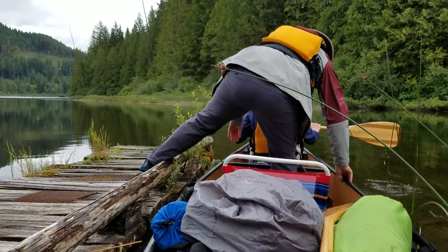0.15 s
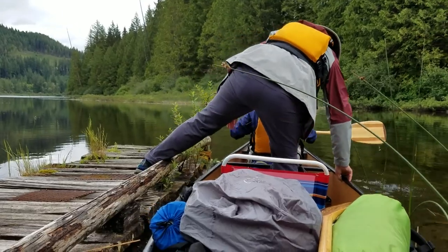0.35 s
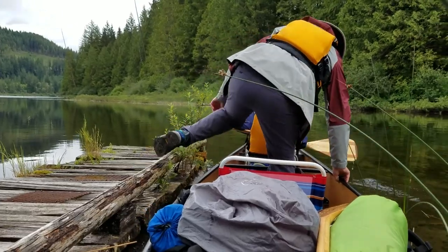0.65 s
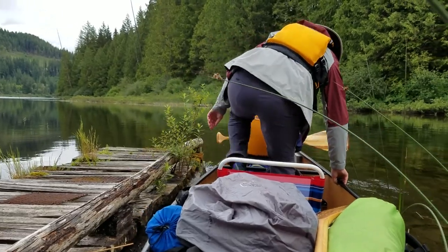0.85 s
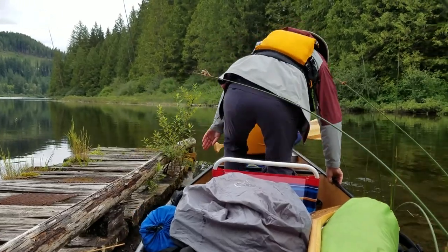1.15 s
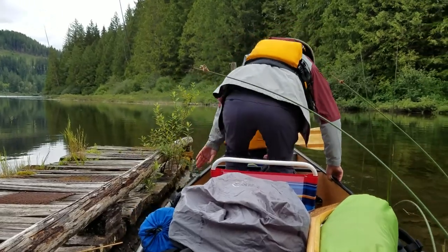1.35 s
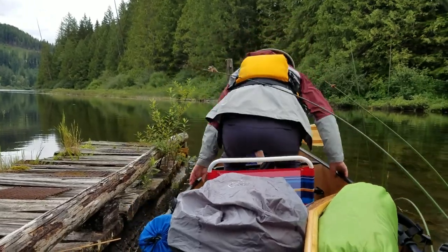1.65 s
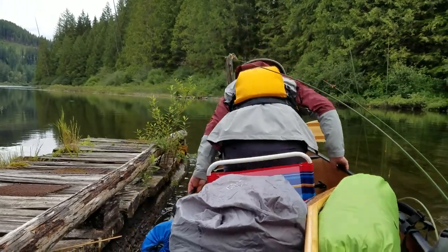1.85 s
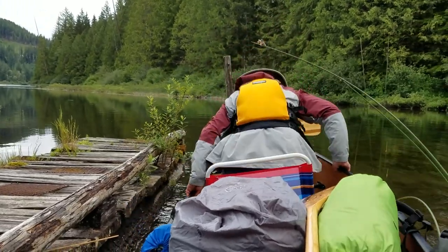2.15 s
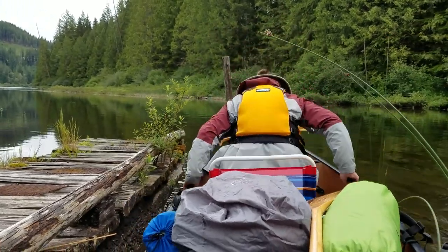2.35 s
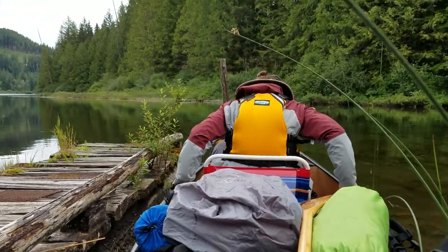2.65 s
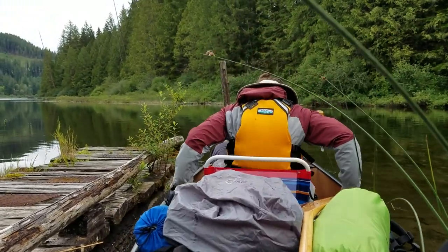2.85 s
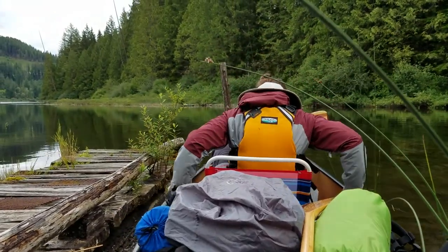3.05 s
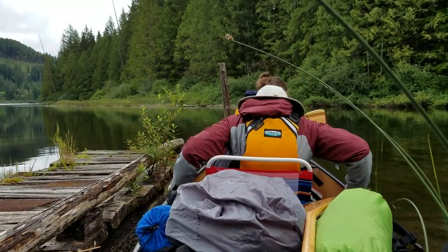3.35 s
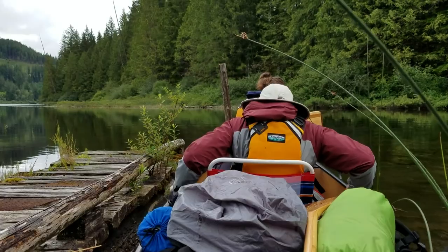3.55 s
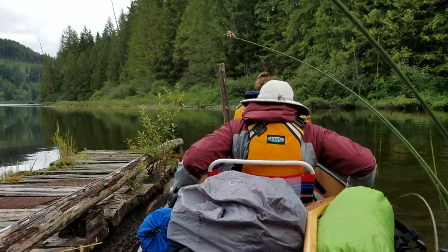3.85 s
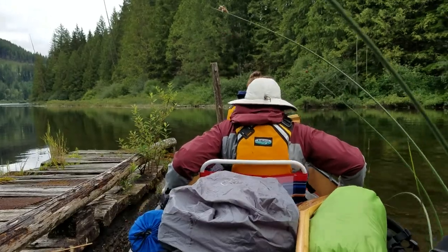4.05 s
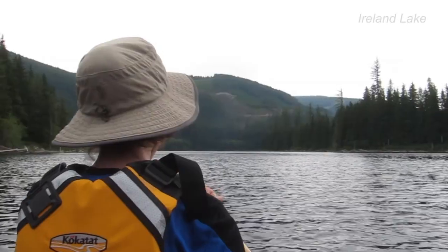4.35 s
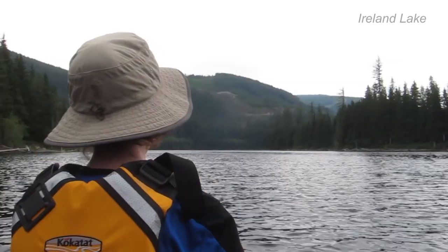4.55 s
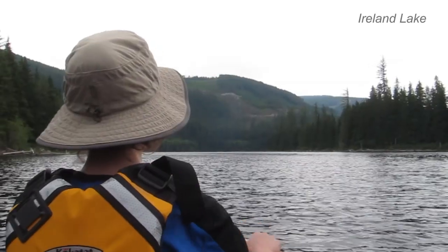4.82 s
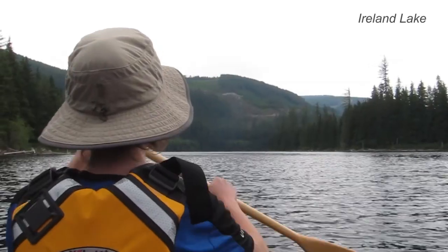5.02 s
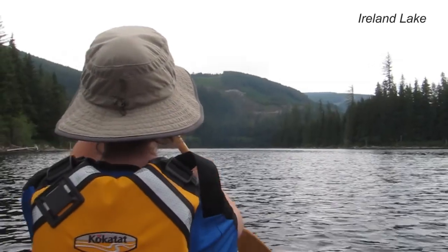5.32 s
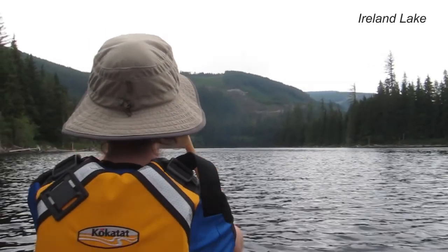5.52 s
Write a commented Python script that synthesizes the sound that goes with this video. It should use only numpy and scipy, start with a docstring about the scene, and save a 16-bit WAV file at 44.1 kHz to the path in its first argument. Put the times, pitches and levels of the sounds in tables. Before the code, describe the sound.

For the first four seconds, a person climbs into a loaded canoe at a dock. Feet and gear strike the hollow hull in uneven knocks and thumps, each ringing briefly. The strongest land at about 0.7, 1.4 and 2.3 seconds, with a deeper cluster around 3.1 and lighter bumps between. Underneath, clothing rustles and scuffs softly, squeaking faintly near 1.6 seconds, and shifting packs rumble through the hull, swelling around 4 seconds. At 4.2 seconds the sound cuts to open water on a thinner microphone with little bass. A paddle stirs a soft wash with fizzing spray, small splashes and plinking drips, and a short rising gulp comes at 5 seconds. Brief wind pops hit the microphone, mostly on the left and strongest near 5.3 seconds. The water continues until the end at about 5.7 seconds.

```python
"""At a log dock a paddler climbs into a loaded canoe: feet and gear knock the hollow hull, which rings
in its damped modes, while cloth scuffs and packs shift with the noise of friction.
Then, out on open water and on a thinner-sounding microphone, paddle water fizzes, drips and gulps
as trapped air resonates, and eddies of wind pop at the microphone's ports."""
import sys
import numpy as np
from scipy import signal
from scipy.fft import rfft, irfft, next_fast_len
from scipy.io import wavfile
from scipy.ndimage import uniform_filter1d, map_coordinates

SR = 44100
rng = np.random.default_rng(int(sys.argv[2]) if len(sys.argv) > 2 else 0)


def wav_record(signal):
    """Record a signal, one row per channel, as 16-bit PCM in the file named by sys.argv[1]."""
    frames = np.transpose(np.atleast_2d(signal))
    bounded = np.clip(frames, -1, 1)
    # unit amplitude maps onto the largest positive 16-bit level
    quanta = np.round(bounded * 32767).astype(np.int16)
    wavfile.write(sys.argv[1], SR, quanta)


N = 250488
AFLOAT_S = 4.234  # the dock gives way to open water
AFLOAT_LENGTH_S = N / SR - AFLOAT_S

# likeness of left and right at the dock and on open water: freq_hz, correlation
DOCK_COHERENCE = [(60, 0.34), (180, 0.4), (550, 0.74), (1650, 0.28), (4970, -0.063), (15000, -0.0045)]
OPEN_COHERENCE = [(300, .3), (1000, 0.23), (3000, 0.53), (6800, -0.27), (15000, 0.67)]
# packs and body shifting: time_s, rumble_db, rustle_db, hiss_db
SHIFT_LEVELS = [(0.0, -65.5, -67.5, -71.5), (0.36, -67.5, -65.5, -71.5), (0.52, -62.5, -60.5, -68),
                (0.63, -63, -63.5, -71), (1.19, -57, -63, -71), (1.41, -44, -63.5, -69.5),
                (1.53, -50.5, -56, -63), (1.6, -48, -54, -61.5), (1.73, -59, -59, -64.5),
                (2.12, -44, -56.5, -65.5), (2.26, -51.5, -58, -61.5), (2.37, -42.5, -57, -61.5),
                (2.56, -55, -61.5, -67), (3.01, -56.5, -62, -66.5), (3.11, -36, -63, -67),
                (3.27, -52.5, -55.5, -63.5), (3.55, -58, -64.5, -69), (3.78, -50.5, -62.5, -69),
                (3.96, -56.5, -54, -57.5), (4.07, -35, -46, -52.5), (4.23, -62, -48.5, -56.5)]
# water beside the hull: time_s, wash_db, spray_db
WATER_LEVELS = [(4.234, -51.5, -62), (4.33, -54, -65), (4.4, -57, -65), (4.58, -58, -61), (4.66, -52, -57),
                (4.73, -52, -57), (4.79, -58, -64), (4.9, -59, -61), (4.98, -58, -51), (5.05, -59, -55),
                (5.09, -63.5, -63), (5.2, -54.5, -63), (5.32, -69.5, -69), (5.42, -59.5, -67),
                (5.46, -68.5, -69), (5.55, -56, -66), (5.68, -62, -66)]


def amp(db):
    return 10 ** (np.asarray(db) / 20)


def unit_rms(x):
    return x / np.sqrt(np.mean(x ** 2) + 1e-20)


def along(points, hz):
    """Interpolation of (freq_hz, value) points on a logarithmic frequency axis."""
    f, v = np.transpose(points)
    return np.interp(np.log(hz + 1), np.log(f + 1), v)


def curves(rows):
    """Linear interpolation, sample by sample, of each column after the time."""
    s, *cols = np.transpose(rows)
    return [np.interp(np.arange(N) / SR, s, c) for c in cols]


def wobble(rate_hz):
    """Smooth random modulation: a spline through Gaussian knots."""
    knots = rng.standard_normal(int(N * rate_hz / SR) + 4)
    return map_coordinates(knots, [np.arange(N) * rate_hz / SR])


def filtered(x, response):
    """Linear filtering: the spectrum times a frequency response."""
    m = next_fast_len(x.shape[-1] + 8192)
    return irfft(rfft(x, m) * response(np.fft.rfftfreq(m, 1 / SR)), m)[..., :x.shape[-1]]


def add(track, s, sound, pan_db=0):
    """Superposition of a sound at time s, louder on the left by pan_db."""
    piece = track[:, round(s * SR):][:, :sound.shape[-1]]
    piece += (sound * amp([[pan_db / 2], [-pan_db / 2]]))[:, :piece.shape[1]]


def noise(spectrum, coherence, patchy_db=0):
    """Partly coherent stereo noise of rms 1, its gain patchy in time and frequency by patchy_db."""
    pair = rng.standard_normal((2, N))
    if patchy_db:
        cells = signal.stft(pair, nperseg=256)[2]
        patches = uniform_filter1d(rng.standard_normal(cells.shape[1:]), size=6, axis=0)
        patches = uniform_filter1d(patches, size=6, axis=1)
        pair = signal.istft(cells * amp(patchy_db * unit_rms(patches)), nperseg=256)[1][:, :N]

    def mid_side(hz):
        angle = np.arccos(np.clip(along(coherence, hz), -1, 1)) / 2
        return amp(along(spectrum, hz)) * [np.cos(angle), np.sin(angle)]
    mid, side = filtered(pair, mid_side)
    return unit_rms(np.array([mid + side, mid - side]))


def swell(length_s):
    """A critically damped envelope: a quick rise and a slower fall."""
    u = np.arange(round(6 * length_s * SR)) / (.4 * length_s * SR)
    return u * np.exp(1 - u)


def burst(centre_hz, octaves, length_s):
    """A swell of band-limited stereo noise, 6 dB down at `octaves` from its centre."""
    envelope = swell(length_s)
    m = next_fast_len(len(envelope) + 1024)
    white = rng.standard_normal((3, m))
    pair = white[0] + 1.45 * white[1:]
    band = amp(-6 * (np.log2((np.fft.rfftfreq(m, 1 / SR) + 1) / centre_hz) / octaves) ** 2)
    return envelope * unit_rms(irfft(rfft(pair) * band, m))[:, :len(envelope)]


def bubble(hz, climb_octaves, life_s):
    """Bubble resonance: a damped, ragged tone whose pitch climbs as the bubble nears the surface."""
    age = np.arange(round(2 * life_s * SR)) / (life_s * SR)
    ragged = np.interp(age, np.linspace(0, 2, 12), rng.standard_normal(12))
    phase = 2 * np.pi * np.cumsum(hz * 2 ** (climb_octaves * age ** 1.5)) / SR + .5 * ragged
    return np.sin(phase) * (1 - np.exp(-age * life_s / .0005)) * amp(-15 * age ** 1.5)


def hull_rumble():
    """Structure-borne sound: shifting packs rumble through the hull."""
    # rumble spectrum: freq_hz, density_db
    spectrum = [(15, -43), (25, -31), (32, -31), (38, -3), (118, 2.5), (325, -3.5), (461, -10.5),
                (560, -14), (700, -24), (910, -55.5), (1540, -120)]
    rumble_db = curves(SHIFT_LEVELS)[0]
    return amp(rumble_db + 2.5 * wobble(25)) * noise(spectrum, coherence=[(60, .9), (600, .85)])


def cloth():
    """Friction noise: cloth rustles, hisses and squeaks; each scuff is a swell with its own colour."""
    # spectra of the rustle and the hiss: freq_hz, density_db
    rustle_spectrum = [(290, -8.5), (500, -7.5), (832, -8), (1210, -7), (1330, -11), (1590, -8.5),
                       (6000, -24.5), (7800, -43), (13200, -120)]
    hiss_spectrum = [(2350, -15), (4000, -5), (4340, -7), (6520, -7.5), (7400, -9.5), (13100, -4),
                     (15800, -4)]
    # cloth, soles and buckles scuffing: time_s, level_db, centre_hz, treble_db, pan_db, length_s
    scuffs = [(0.5315, -59.5, 1800, -6.5, 3.5, 0.025), (0.632, -56, 1360, -38, -7, 0.0091),
              (0.701, -66.5, 5390, -13.5, -3, 0.0058), (0.958, -69.5, 6200, -22, 2, 0.0061),
              (1.012, -62.5, 2650, -19.5, 0, 0.029), (1.1474, -45, 1350, -16, -1.5, 0.022),
              (1.5226, -50.5, 1360, -29.5, -12.5, 0.006), (1.5872, -48, 1700, -17.5, -3, .012),
              (1.598, -55, 3640, -10, 8.5, .015), (1.631, -48.5, 1990, -22.5, -1.5, .02),
              (1.975, -53, 970, -29, 3.5, 0.009), (2.053, -41, 760, -40, -2, .013),
              (2.087, -42, 1500, -40.5, -1.5, 0.0094), (2.139, -51.5, 1230, -26.5, -4.5, 0.014),
              (2.487, -60.5, 1500, -6.5, -1.5, 0.023), (2.749, -61, 1210, -16, -1, 0.004),
              (3.042, -44.5, 1050, -39, 2, 0.016), (3.091, -42, 1030, -23.5, -5, 0.0065),
              (3.271, -39, 1490, -17, -5.3, 0.01), (3.41, -56, 1660, -12.5, -7.5, 0.011),
              (3.5364, -60, 2260, -11, 2, 0.00856), (3.606, -57.5, 1230, -13.5, 0.5, .012),
              (3.7805, -53, 1700, -14, 0, 0.026), (3.833, -47, 1090, -16.5, .6, .015),
              (3.855, -53.5, 1550, -11, -5.5, 0.011), (4.211, -46, 1790, -16.5, 4, 0.019)]
    # narrow-band squeaks of rubbed cloth: start_s, level_db, centre_hz
    squeaks = [(1.545, -61, 2020), (1.575, -55.5, 3860), (1.6, -61, 4080), (1.628, -49.5, 2070),
               (1.632, -60, 4200)]
    _, rustle_db, hiss_db = curves(SHIFT_LEVELS)
    rubs, treble_gain = np.zeros((2, 2, N))
    for s, db, centre_hz, treble_db, pan_db, length_s in scuffs:
        add(rubs, s - .002, amp(db) * burst(centre_hz, octaves=.63, length_s=length_s), pan_db)
        add(treble_gain, s - .002, amp(db + treble_db) * swell(length_s), pan_db)
    for s, db, centre_hz in squeaks:
        add(rubs, s, amp(db) * burst(centre_hz, octaves=.15, length_s=.025), pan_db=-3)
    rustle = amp(rustle_db + 1.8 * wobble(30)) * noise(rustle_spectrum, DOCK_COHERENCE, patchy_db=1.5)
    hiss_gain = amp(hiss_db + .4 * wobble(14)) + treble_gain
    return rustle + rubs + hiss_gain * noise(hiss_spectrum, DOCK_COHERENCE, patchy_db=-.2)


def wash():
    """Turbulent water beside the hull: broadband noise and a swarm of tiny resonating bubbles."""
    # wash spectrum: freq_hz, density_db
    spectrum = [(59, -49.5), (100, -1), (261, -38), (417, -17), (874, 1.5), (2120, -1), (3580, -1.5),
                (6370, -8.5), (7500, -18), (9750, -39), (16500, -120)]
    swarm = np.zeros((2, N))
    for when, pitch, size, side in rng.random((550, 4)):
        hz = 900 * 2 ** (2.9 * pitch)
        ring = amp(-2.5 * np.log(1 - size)) * bubble(hz, climb_octaves=.05, life_s=7 / hz)
        add(swarm, AFLOAT_S + when * AFLOAT_LENGTH_S, ring, pan_db=7 * side - 4)
    swarm /= np.std(swarm[:, round(AFLOAT_S * SR):])
    gain = amp(curves(WATER_LEVELS)[0] + 2 * wobble(60))
    return gain * (noise(spectrum, OPEN_COHERENCE, patchy_db=2.5) + amp(-1) * swarm)


def spray(tick_t60_s=.008):
    """Amplitude-modulated noise: spray fizzes, and ticks in the top octave decay exponentially."""
    # spectra of the fizz and of a tick: freq_hz, density_db
    fizz_spectrum = [(2940, -5), (5000, -11), (6970, -13), (8170, -6), (12000, -3), (15800, -19)]
    tick_spectrum = [(4000, -30), (7000, -16), (9500, -5), (12000, 4), (15800, -20)]
    # the clearest ticks: start_s, level_db, pan_db
    ticks = [(4.3446, -53, -4), (4.4194, -44.5, -4), (4.4728, -49.5, 2.5), (4.594, -48, 2),
             (4.6366, -46, -5.5), (4.6526, -45.5, -8.5), (4.665, -36, -7), (4.712, -61, -6),
             (4.7324, -30.5, -2), (4.7481, -41.5, 6.5), (4.7709, -47, -4.5), (4.812, -49, -2),
             (4.825, -45, -6.5), (4.915, -46, 7), (4.9593, -35.5, 0.5), (4.9871, -35.5, 1),
             (5.06, -39, 10.5), (5.0994, -57, 0), (5.1163, -44, -9.5), (5.246, -54, 5.5),
             (5.2631, -46.5, 4), (5.4046, -37, 6), (5.5, -47.5, 2.5)]
    spray_db = curves(WATER_LEVELS)[1]
    tick_gain, t = np.zeros((2, N)), np.arange(SR // 20) / SR
    draws = rng.random((90, 3)) * [AFLOAT_LENGTH_S, 8, 10] + [AFLOAT_S, -3, -6]
    faint = [(s, spray_db[int(s * SR)] + over_db, pan_db) for s, over_db, pan_db in draws]
    for s, db, pan_db in ticks + faint:
        add(tick_gain, s, amp(db - 60 * t / tick_t60_s), pan_db)
    fizz = amp(spray_db + 2.5 * wobble(150)) * noise(fizz_spectrum, OPEN_COHERENCE, patchy_db=1.8)
    return fizz + tick_gain * noise(tick_spectrum, OPEN_COHERENCE)


def splats():
    """Impact noise: drops strike water and hull, and the paddle clicks once."""
    # the clearest drops: time_s, level_db, centre_hz, pan_db
    drops = [(4.243, -51, 2680, -3), (4.265, -45.5, 2100, -6), (4.318, -42.5, 2170, 3),
             (4.419, -52, 5430, 4), (4.552, -52, 5820, -5.5), (4.59, -46, 4260, 4), (4.649, -39.5, 2290, 0),
             (4.674, -35, 3040, 1), (4.71, -43, 3170, 0), (4.724, -41, 2210, 1), (4.837, -45, 2570, 7),
             (4.873, -45.5, 2340, -6), (4.97, -40, 4770, -4), (5.0273, -42.5, 6270, 3),
             (5.064, -47, 2010, 16), (5.114, -48, 3800, .6), (5.144, -44.5, 3480, 0),
             (5.1903, -42, 4800, 0), (5.209, -45.5, 5660, 4), (5.3947, -42, 6450, -3),
             (5.469, -51.5, 2390, 6), (5.5516, -49, 4400, 11), (5.569, -43, 3340, -1)]
    # the paddle's click: start_s, level_db, centre_hz, width_octaves, length_s
    click = (5.4148, -28, 5200, 1.05, .0012)
    out = np.zeros((2, N))
    faint = [(AFLOAT_S + when * AFLOAT_LENGTH_S, -57.5 + 8 * size, 2000 * 3.5 ** pitch, 10 * side - 5)
             for when, size, pitch, side in rng.random((30, 4))]
    for s, db, centre_hz, pan_db in drops + faint:
        add(out, s - .001, amp(db) * burst(centre_hz, octaves=.49, length_s=.0029), pan_db)
    add(out, click[0], amp(click[1]) * burst(*click[2:]))
    return out


def drips():
    """Single bubbles ring as their air springs against the water; small, high ones climb less."""
    # the clearest bubbles and drips: start_s, level_db, pitch_hz, life_s, pan_db
    bubbles = [(4.236, -48.5, 1060, 0.017, -1), (4.244, -48.5, 2680, .017, -2),
               (4.307, -42, 2490, 0.0094, -4), (4.32, -36.5, 2190, 0.0059, -7),
               (4.329, -34, 1516, 0.0096, -10), (4.346, -43, 1760, 0.013, -4), (4.357, -56, 1290, .04, -6),
               (4.429, -40.5, 771, 0.036, 2.5), (4.463, -56, 1410, 0.04, 2),
               (4.488, -49.5, 1084, 0.0257, -1), (4.648, -49, 2280, 0.028, -3),
               (4.674, -27, 2960, 0.0043, -13), (4.673, -25, 3250, 0.0024, 17),
               (4.722, -42, 1930, 0.0098, -1), (4.836, -49, 2270, 0.023, -5),
               (4.861, -47.5, 1460, 0.018, 7), (4.935, -57.5, 643, 0.044, 4),
               (4.974, -35, 4430, 0.0034, 14), (5.112, -52, 794, 0.027, 2), (5.162, -47, 2300, 0.0088, -3),
               (5.182, -40, 1080, 0.0087, 0), (5.346, -42.5, 1500, 0.0065, 2), (5.347, -65, 562, .06, -3),
               (5.369, -48.5, 2140, 0.012, -5), (5.468, -50, 2390, .012, -3), (5.5, -48, 1830, .0086, 6.5),
               (5.528, -45, 2440, 0.01, 1), (5.564, -49.5, 1550, 0.021, 5), (5.568, -47, 3360, 0.012, 8),
               (5.576, -43, 4420, 0.0067, 1), (5.654, -50, 1400, 0.0082, -8)]
    out = np.zeros((2, N))
    for s, db, hz, life_s, pan_db in bubbles:
        climb_octaves = 5.76 * life_s * (1000 / hz) ** 1.61
        add(out, s, amp(db) * bubble(hz, climb_octaves, life_s), pan_db)
    return out


def gulp():
    """Cavity resonance: the pitch of one large air pocket rises as it closes."""
    # the closing pocket: time_s, pitch_hz, level_db
    pocket = [(5.01, 843, -38), (5.028, 962, -32.5), (5.036, 1023, -45), (5.046, 1360, -31.5),
              (5.065, 1505, -44), (5.08, 1840, -56), (5.097, 2500, -69)]
    pitch_hz, level_db = curves(pocket)
    t = np.arange(N) / SR
    closing = (t > pocket[0][0]) & (t < pocket[-1][0])
    phase = 2 * np.pi * np.cumsum(pitch_hz * closing) / SR
    return closing * amp(level_db) * np.sqrt(2) * np.sin(phase)


def wind_pops(wake_hz=516, wake_db=-15, wake_s=.01276):
    """Eddy shedding: a brief pressure pulse at one port, faint in the other, then a weaker wake."""
    # eddies at the left and the right port: time_s, level_db, pitch_hz
    left_pops = [(4.3958, -28, 600), (4.4092, -49, 490), (4.7945, -28.5, 792), (4.806, -47, 400),
                 (4.8198, -39.5, 536), (4.833, -43, 400), (4.891, -40, 430), (4.938, -45, 513),
                 (5.04, -31, 470), (5.0628, -24.5, 990), (5.0663, -22.5, 660), (5.21, -39, 487),
                 (5.218, -37, 670), (5.224, -39, 640), (5.2621, -20.5, 790), (5.2667, -18, 890),
                 (5.2815, -19.5, 800), (5.2892, -26, 600), (5.2927, -21, 1040), (5.3027, -33.5, 690),
                 (5.3811, -34, 616), (5.384, -29, 960), (5.4, -27.5, 633), (5.4041, -26, 940),
                 (5.4184, -43, 630), (5.588, -47, 420), (5.6145, -45, 583)]
    right_pops = [(4.2465, -44, 610), (4.2763, -50, 1200), (4.3396, -41, 520), (4.3859, -44, 500),
                  (5.115, -43, 726)]
    out, t = np.zeros((2, N)), np.arange(-300, 301) / SR
    pulse = lambda hz: np.cos(2 * np.pi * hz * t + .49) * np.exp(-(t * hz / .64) ** 2)
    faint = [(AFLOAT_S + when * AFLOAT_LENGTH_S, -61 + 6 * size, wake_hz)
             for when, size in rng.random((10, 2))]
    for pops, ports_db in (left_pops + faint, [[0], [-28]]), (right_pops, [[-28], [0]]):
        for s, db, hz in pops:
            late, pitch = rng.random(2)
            gain = amp(db) * amp(ports_db)
            wake = amp(wake_db) * pulse(wake_hz * (.8 + .4 * pitch))
            add(out, s + t[0], gain * pulse(hz))
            add(out, s + t[0] + wake_s * (.286 + .675 * late), gain * wake)
    return out


def hull_knocks(rise_s=.004, driven_octaves=.55, ring_db=-3.5, sharp_db=-6):
    """Modal resonance: a blow drives the hull modes near its thud, and the deep ones by its weight."""
    # modes of the loaded hull: pitch_hz, level_db, t60_s, pan_db
    hull_modes = [(87.2, -11, 0.47, 18.5), (125.5, -2.5, 0.44, 1), (148.3, -4, 0.41, -0.5),
                  (169.6, -4.5, 0.38, 7.5), (203.2, 0, 0.28, -0.5), (250, -3.5, 0.22, 2),
                  (296.9, 0.5, 0.17, 2.5), (322.6, 1, 0.18, 0), (344, 5, 0.11, 1.5),
                  (383.8, -1, 0.18, -2.5), (427.6, 1, 0.16, 0.5), (525.4, 4, 0.11, 2), (579, -1.5, .15, 3),
                  (620, -11, 0.24, -2.5), (680, 1.5, 0.073, -1), (820, -28, 0.04, -8),
                  (970, -17.5, .12, -0.5), (1110, -9.5, 0.052, -29.5), (1300, -15, 0.11, -1),
                  (1470, -18.5, .08, 4.5)]
    # blows of feet and gear: start_s, level_db, thud_hz, thud_db, boom_db, contact_db, damping_factor
    blows = [(0.401, -58.5, 169, 1, -4.5, -11.5, 0.19), (0.659, -15.5, 340.5, 2.5, -3.5, -16.5, 1.06),
             (0.886, -51, 378, 10, -24, -11.5, 0.95), (1.143, -41.5, 300, -2.5, -8.5, -20, 0.87),
             (1.159, -34.5, 128, -2, -13, -13, 1.34), (1.211, -45.5, 119.5, -10, -14, -3, 3),
             (1.307, -35.5, 203.7, -2, -8.5, -27.5, 2.8), (1.353, -14, 324, 8.5, -5.5, -15, 1.04),
             (1.514, -30, 546, 1.5, -7.5, -6.5, 2), (1.585, -37, 224, -5, -4, -5.5, 1.07),
             (1.648, -21.5, 323, 5.5, -11.5, -19, 1.74), (1.673, -36.5, 300, 0, -7, -28, 0.74),
             (1.8, -41, 171, 1, 5, -7, 3.5), (1.905, -44.5, 564, -6, 9.5, 5, 2.1),
             (2.052, -33, 238, -6, -29, -22, 0.8), (2.125, -24, 175.4, 0.5, -5.5, -24, 1.74),
             (2.157, -44, 154, -5.5, 1, -16, 0.51), (2.283, -12, 223.7, 2.5, -11, -18.5, 1.16),
             (2.334, -26, 185.3, 8, -7.5, -44.5, 0.88), (2.432, -27.5, 184.4, -5.5, -21.5, -29, 0.92),
             (2.47, -36.5, 254, 3.5, -18, -22, 1.1), (2.566, -29.5, 185.8, -1, -29.5, -19, 2.6),
             (2.639, -41.5, 185, -0.5, -15.5, -9.5, 1.1), (2.754, -44.5, 300, -17, -14, -3, 0.69),
             (2.886, -44, 311, 4, 1, -3.5, 2.4), (3.061, -23, 137.6, 6, 8, -38, 0.8),
             (3.068, -17, 300, 1.5, -20, -21, 1.1), (3.099, -18.5, 137, 15, 0, -27, 1.3),
             (3.336, -31, 395, 3, -31, -4.5, 2.2), (3.396, -32.5, 287, 1, 2.5, -18, 1.65),
             (3.427, -35, 136, 0.5, 11.5, -17, 2.25), (3.578, -45.5, 126, -7, 9.5, -10.5, 2.7),
             (3.702, -49, 237, 1, -13, -8, 2.1), (3.824, -34.5, 284, -6, 5, -12.5, 1.7),
             (3.869, -39, 132, 1, -6, -26, 1.3), (4.006, -33, 210, -5, -3.5, -17, 4.2),
             (4.066, -46, 125, 7.5, -1, -8, 0.54), (4.106, -31, 241, 1.5, -19, -17, 1.7)]
    # dull and sharp parts of the contact noise: freq_hz, density_db
    dull_spectrum = [(300, -14), (600, 0.5), (1300, -11), (2000, -47)]
    sharp_spectrum = [(900, -21.5), (1400, 2), (3400, -14.5), (9000, -47), (12000, -74.5)]
    out, t = np.zeros((2, N)), np.arange(2 * SR // 5) / SR
    hz, mode_db, t60_s, pan_db = np.transpose(hull_modes)[:, :, None]
    dull, sharp = noise(dull_spectrum, DOCK_COHERENCE), noise(sharp_spectrum, DOCK_COHERENCE)
    onset = lambda time_s: 1 - np.exp(-(t / time_s) ** 2)
    mode_onset = onset(1.23 * rise_s * (300 / hz) ** .7)  # deep modes take longer to start swinging
    for s, db, thud_hz, thud_db, boom_db, contact_db, damping in blows:
        detune_octaves = np.log2(hz / max(thud_hz, 167))
        drive = amp(-6 * (detune_octaves / driven_octaves) ** 2) + amp(boom_db) * (hz < 190)
        decay = lambda t60: amp(-60 * damping * t / t60)
        # rattling cargo makes each mode waver in phase
        drift = np.cumsum(rng.normal(0, .22, (len(hz), 125)), axis=1)
        drift = uniform_filter1d(np.repeat(drift, 177, axis=1), size=353, axis=1)[:, :len(t)]
        modes = mode_onset * decay(t60_s) * np.sin(2 * np.pi * hz * t + drift)
        shares = drive * amp(mode_db + rng.normal(0, 1.5, hz.shape)) * amp(pan_db / 2 * [1, -1])
        ring = amp(ring_db) * shares.T @ modes
        # the struck panel itself gives a few strong cycles
        thud = amp(thud_db - 60 * t * thud_hz / 22) * np.sin(2 * np.pi * thud_hz * t)
        thud *= onset(1.36 * rise_s)
        span = slice(round(s * SR), round(s * SR) + len(t))
        contact = decay(.14) * dull[:, span] + amp(sharp_db) * decay(.1) * sharp[:, span]
        contact *= amp(contact_db) * onset(.7 * rise_s)
        add(out, s, amp(db) * (thud + ring + contact))
    return out


def dock_microphone(hz):
    """A high-pass response with a phase difference: the left port lags in the bass."""
    # lag of left behind right: freq_hz, phase_rad
    lag = [(70, 0.4), (120, 1), (170, 0.23), (300, 0.15), (700, 0.069), (1500, 0.00702)]
    return np.exp(.5j * along(lag, hz) * [[-1], [1]]) * hz ** 2 / (hz ** 2 + 55 ** 2)


def thin_microphone(hz):
    """A high-pass response that cuts more bass, with a narrow notch in the treble."""
    notch = 1 - .96 * np.exp(-((hz - 8200) / 400) ** 4)
    return notch * hz ** 3 / (hz ** 3 + 230 ** 3)


def scene():
    """Superposed sources: the dock first, open water after, each through its own microphone."""
    afloat = np.arange(N) >= AFLOAT_S * SR
    dock = hull_knocks() + hull_rumble() + cloth()
    open_water = wash() + spray() + splats() + drips() + gulp() + wind_pops()
    return filtered(dock, dock_microphone) * ~afloat + filtered(open_water, thin_microphone) * afloat


def record(dry):
    """Band limiting: an ideal low-pass filter."""
    return filtered(dry, lambda hz: hz < 15800)


dry = scene()
out = record(dry)
wav_record(out)
```